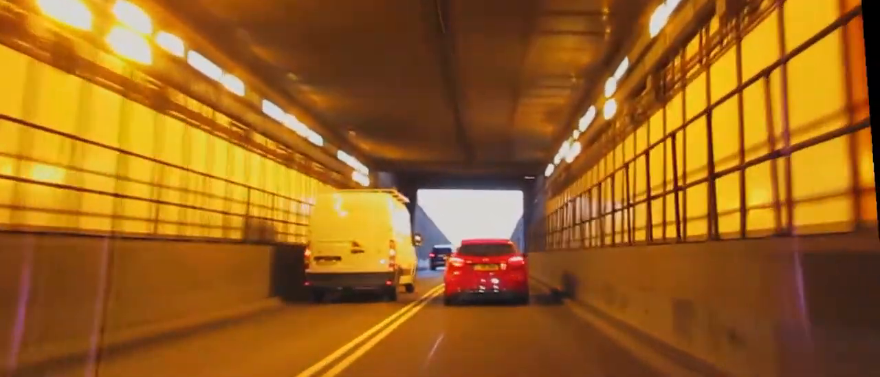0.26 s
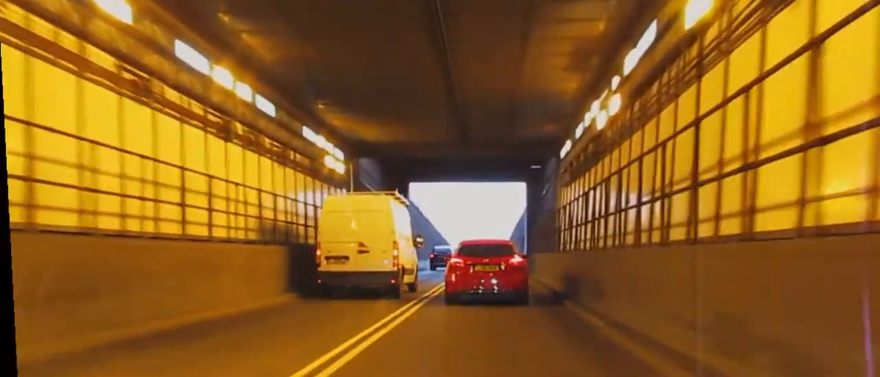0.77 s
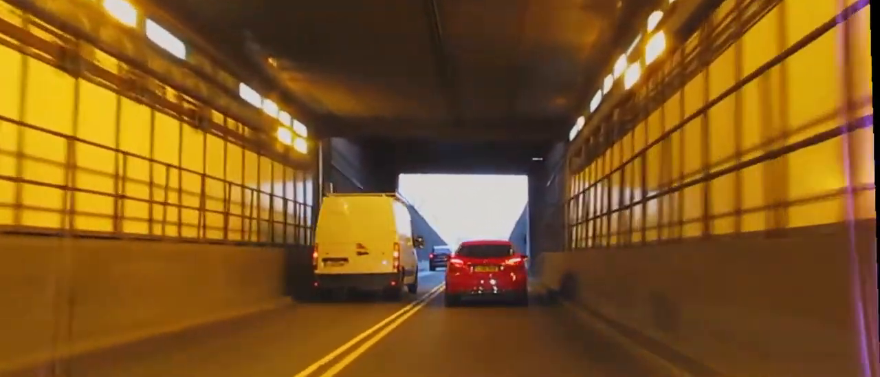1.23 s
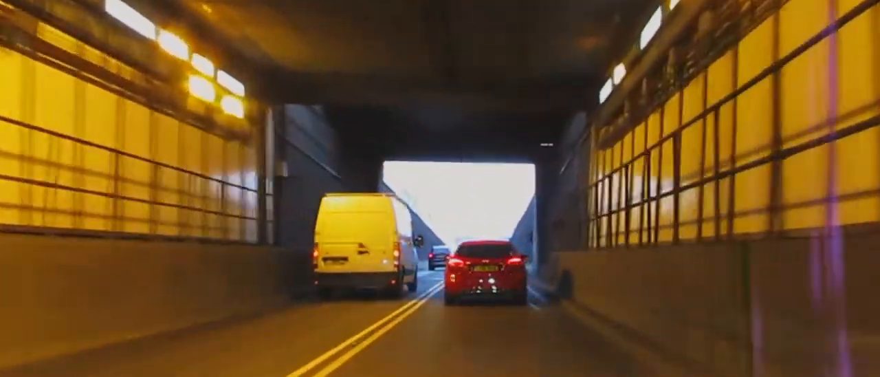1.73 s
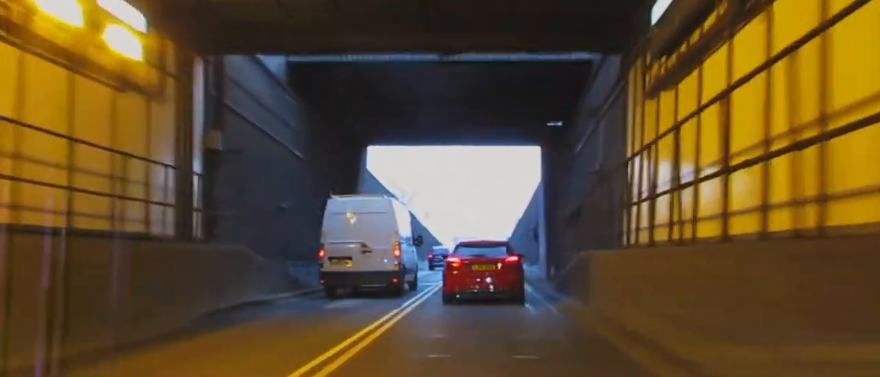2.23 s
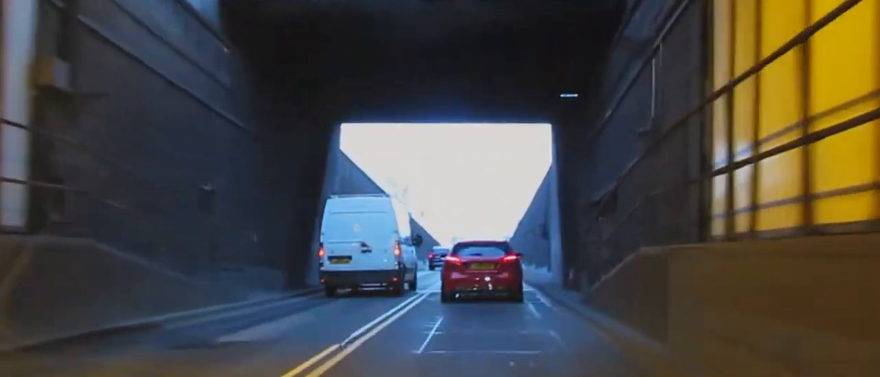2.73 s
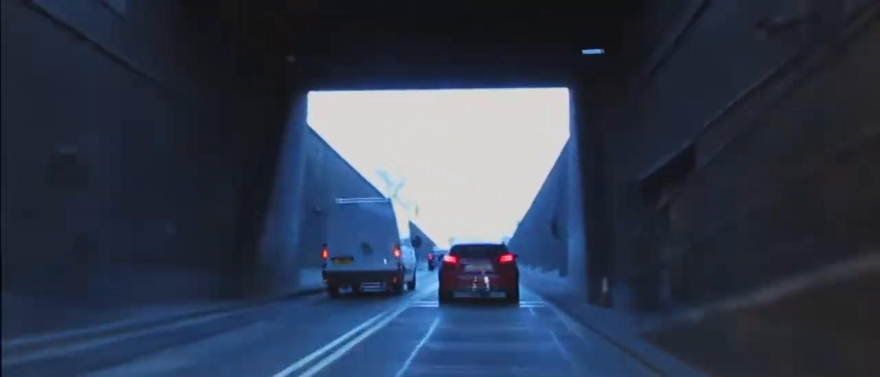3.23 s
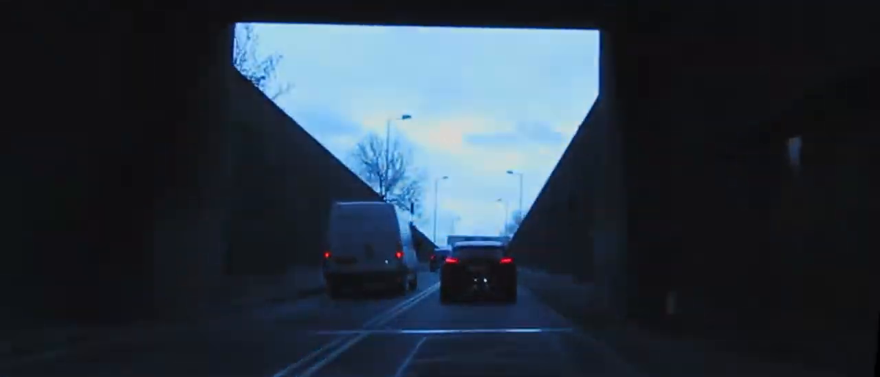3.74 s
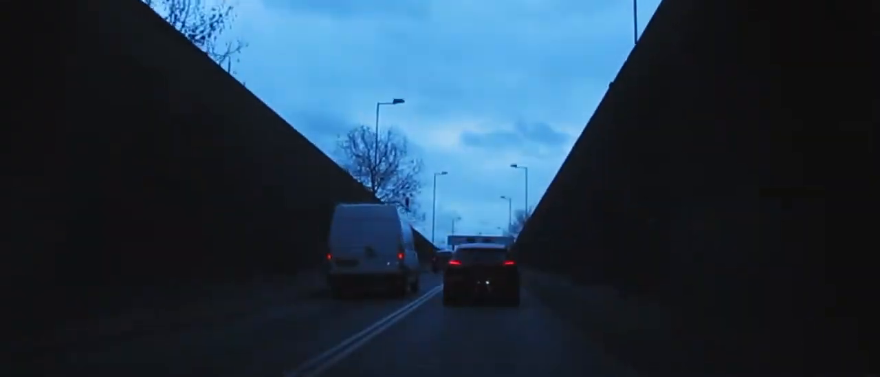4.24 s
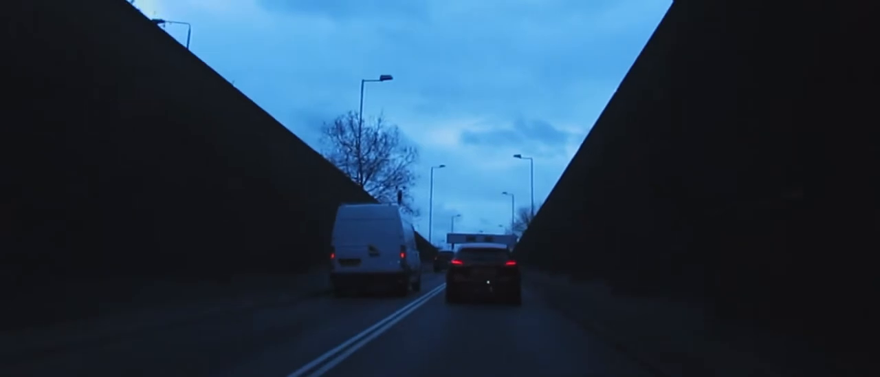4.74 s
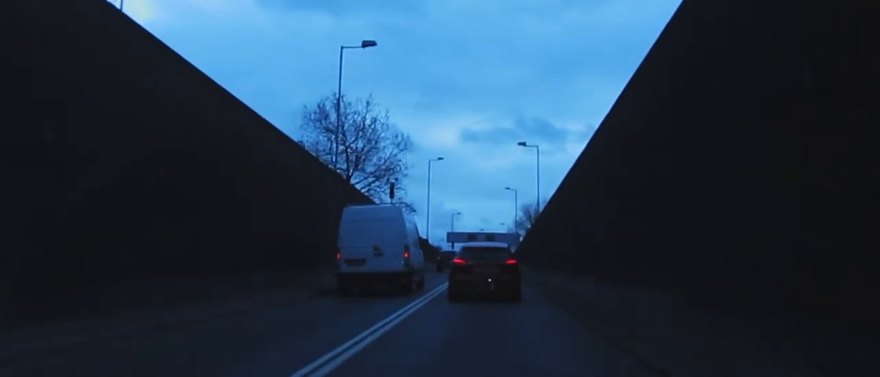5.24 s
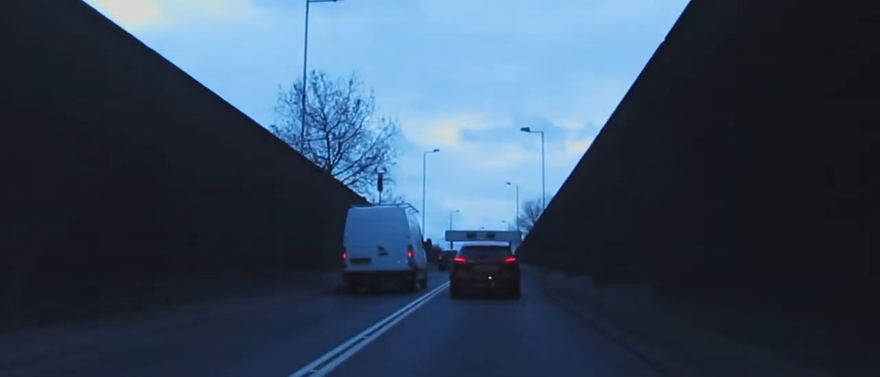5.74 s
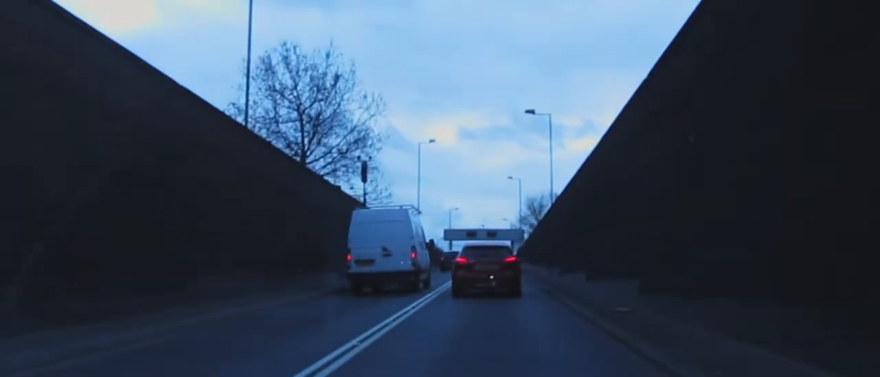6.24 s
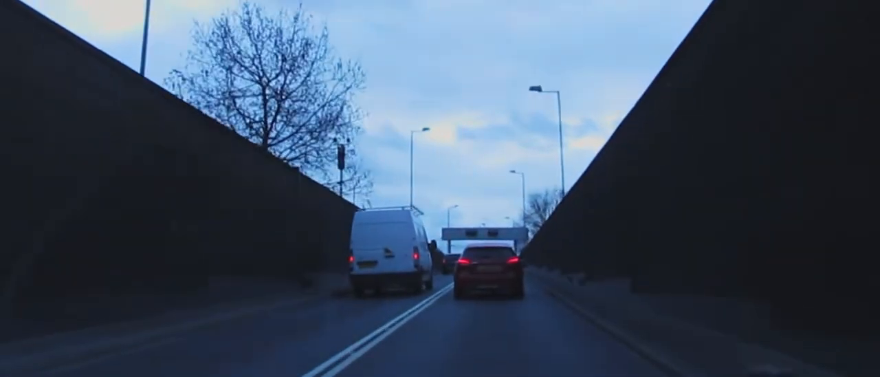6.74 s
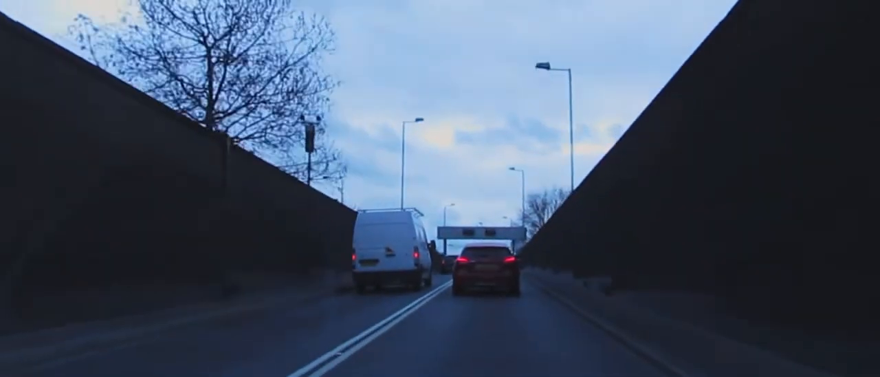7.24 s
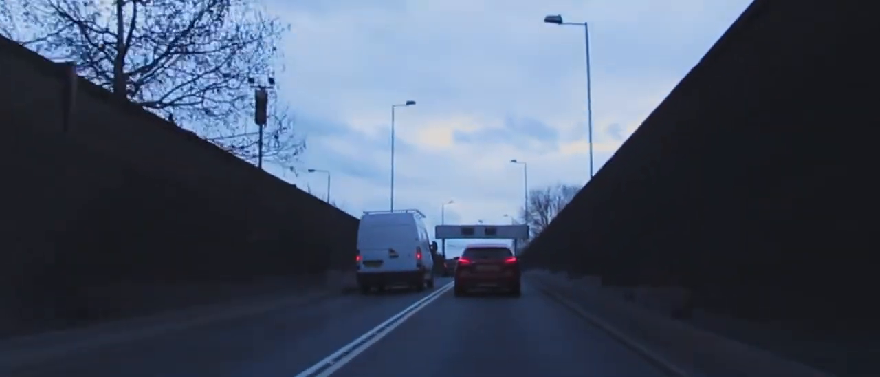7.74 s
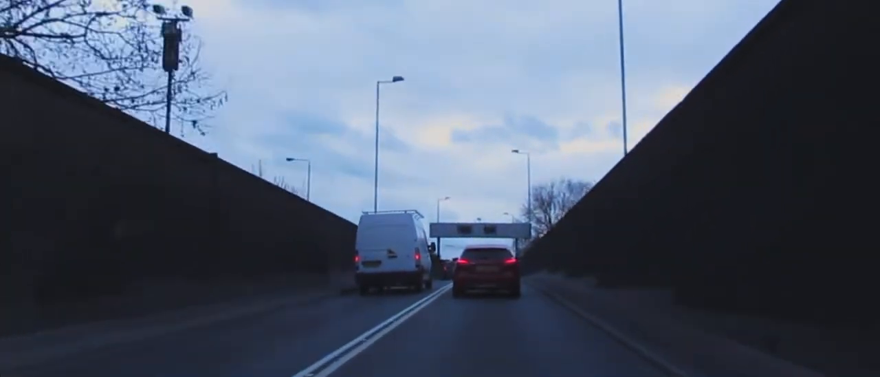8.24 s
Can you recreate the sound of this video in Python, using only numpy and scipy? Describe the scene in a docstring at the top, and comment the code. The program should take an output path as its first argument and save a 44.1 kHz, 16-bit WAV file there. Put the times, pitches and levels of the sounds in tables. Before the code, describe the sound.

Inside a car in a tunnel, low engine drone and echoing tyre roar, then thumps at the mouth, quieter road and a harder-pulling engine.

```python
"""Inside a car in a road tunnel: the engine drones at low revs and the tyre roar comes back off the walls.
At the mouth the worn road thumps under the wheels, and the roar falls away in steps past the roof and portal.
Then a few small ticks and a brush of cloth come through, while the engine pulls harder up an open ramp
between concrete walls. The engine is a sum of multiples of its firing rate; road, tyres and air are
filtered noise; thumps and ticks are short pushes and bursts ringing resonances, and cloth is grainy hiss."""
import sys
import numpy as np
from scipy import signal
from scipy.fft import rfft, irfft, next_fast_len
from scipy.io import wavfile

SR = 44100
rng = np.random.default_rng(int(sys.argv[2]) if len(sys.argv) > 2 else 0)


def materialize(psi):
    """Save the field psi as 16-bit PCM at rate SR to the path in sys.argv[1].

    A 1-D psi becomes a single channel; in a 2-D psi each row is a channel.
    """
    bounded = np.clip(np.atleast_2d(psi).T, -1, 1)
    quanta = np.round(bounded * 32767).astype(np.int16)
    wavfile.write(sys.argv[1], SR, quanta)


N = 374406
TIME = np.arange(N) / SR  # seconds
SIZE = 2 * next_fast_len(N // 2 + 1, True)  # even FFT length
FREQ = np.maximum(np.arange(SIZE // 2 + 1) * SR / SIZE, 1)  # Hz, kept off zero

# Joints and dips in the road. Each row: time in seconds, peak level in dB, judder from 0 to 1.
JOINTS = [(3.608, -12.5, 0.37), (3.757, -8, 0), (4.214, -12.5, 0.06), (4.352, -8.5, 0.13),
          (4.53, -11, 0.24), (4.565, -9.5, 0.15), (4.59, -7, .3), (4.633, -9, 0.25), (4.708, -11.5, .15),
          (4.771, -11, .6), (4.798, -5, 0.15), (4.812, -11, 0.8), (4.841, -16, 0), (4.953, -18, .02)]
TYRE_RING_HZ = 216.9  # the air inside the tyres
CLIMB_S = 5.7  # the throttle starts to open for the climb
# the middle and length in seconds of the passage out from under the roof, then out of the portal
ROOF_END_S, ROOF_PASSING_S, PORTAL_END_S, PASSING_S = 3.81, 0.27, 4.49, 0.36


def undb(db):
    """Decibels to gain."""
    return 10 ** (np.asarray(db) / 20)


def unit(x):
    """Scale to rms 1."""
    return x / np.sqrt(np.mean(x ** 2))


def curves(table):
    """Each column of a timed table, at every sample."""
    s, *columns = np.transpose(table)
    return [np.interp(TIME, s, c) for c in columns]


def step(s, length):
    """Glide from 0 to 1 over length seconds, centred on s."""
    return np.clip((TIME - s) / length + .5, 0, 1)


def swell(s, spread):
    """A smooth hump of height 1 centred on s."""
    return np.exp(-((TIME - s) / spread) ** 2)


def colour(points):
    """Gain at every frequency from (Hz, dB) points."""
    hz, db = np.transpose(points)
    return undb(np.interp(np.log(FREQ), np.log(hz), db))


def bands(table):
    """Gain at every frequency from (Hz, width Hz, dB) peaks and dips."""
    return undb(sum(db / (1 + (2 * (FREQ - hz) / width) ** 2) for hz, width, db in table))


def resonance(hz, width):
    """Response of one damped resonance, gain 1 at its centre."""
    return 1 / (1 + 1j * (FREQ ** 2 - hz ** 2) / (FREQ * width))


def shape(x, response):
    """Pass a sound through a frequency response."""
    return irfft(rfft(x, SIZE) * response, SIZE)[..., :N]


def walk(rate):
    """Smooth chance with spread 1, changing about rate times a second."""
    return unit(shape(rng.standard_normal(N), np.exp(-(FREQ / rate) ** 2) * (FREQ > 1)))


def diffuse(response):
    """Noise of rms 1 filling the cabin: the bass is nearly alike at both ears, the treble much less so."""
    # Stereo spread. Each row: frequency in Hz, side level relative to mid in dB.
    spread_points = [(60, -19), (110, -13), (200, -28), (380, -13.5), (700, -10.5), (1290, -6.5),
                     (2380, -1), (4400, -3.5), (8120, 1.5), (15000, 3)]
    mid, side = rng.standard_normal((2, N))
    width = colour(spread_points)
    side = shape(side, width)
    ears = np.array([mid + side, mid - side])
    return unit(shape(ears, response / np.sqrt(1 + width ** 2)))


def reflections(share, decay_s=0.00437, corner_hz=1500):
    """The direct path plus milliseconds of echoes off small panels, which reflect mainly short waves."""
    echoes = rng.standard_normal(N) * np.exp(-TIME / decay_s) * (TIME > decay_s / 2)
    spectrum = rfft(echoes, SIZE) / np.sqrt(np.sum(echoes ** 2))
    return 1 + share * spectrum / (1 + (corner_hz / FREQ) ** 2)


def cabin():
    """The low modes of the car; seats and carpet soak up what lies above them."""
    # Booms of the body and the cabin air. Each row: centre in Hz, width in Hz, level in dB.
    booms = [(31.2, 33.8, 2), (64, 50.6, -3.5), (76, 34, -13), (126, 39, -3.5), (166.5, 18, 0),
             (199, 19.5, -2), (238.5, 19, -3), (314, 42, -8)]
    modes = sum((-1) ** k * undb(db) * resonance(hz, width) for k, (hz, width, db) in enumerate(booms))
    return modes / (1 + (FREQ / 420) ** 4) / (1 + (17 / FREQ) ** 4)


def tyre_give():
    """The tyre gives way under a blow and passes on only its low part."""
    give_hz = 265
    return 1 / (1 + (FREQ / give_hz) ** 10)


def throttle():
    """0 while cruising, 1 while pulling up the ramp."""
    opening_s = 0.51
    return step(CLIMB_S + opening_s / 2, opening_s)


def road(climb_db, worn_db, smooth_db):
    """Offset in dB for a road noise on the climb, on the worn stretch at the mouth and on the smooth one."""
    worn_from_s, smooth_from_s, smooth_to_s, blend_s = 3.2, 4.87, 5.7, 0.12
    worn, smooth, coarse = (step(s, blend_s) for s in (worn_from_s, smooth_from_s, smooth_to_s))
    return climb_db * throttle() + worn_db * (worn - smooth) + smooth_db * (smooth - coarse)


def engine(boom_exponent=0.27):
    """Soft firing pulses as a drone plus overtones, which rise with load and swell through cabin modes."""
    # Engine lines. Each row: multiple of the firing rate, level in dB cruising, level in dB pulling,
    # both before the cabin boom.
    overtones = [(2, -45, -28.3), (3, -34, -22.8), (4, -39.5, -30.5), (5, -42, -34)]
    # Load on the engine. Each row: time in seconds, load from 0 cruising to 1 pulling hard.
    load_points = [(0, 0), (3.25, 0.23), (3.55, 0.61), (4.65, 0.3), (4.95, 0), (5.85, 0.3), (6.03, 0.86),
                   (7.4, 0.95), (8.49, 0.66)]
    # Drone at the firing rate. Each row: time in seconds, level in dB.
    drone_points = [(0, -23.5), (1.1, -17.3), (2.3, -19.3), (3.2, -21.3), (3.7, -25.5), (5.0, -27),
                    (5.4, -24.5), (6.2, -24), (7.5, -22.5), (8.49, -20)]
    firing_hz, creep_from_s, creep_hz_per_s, climb_hz_per_s = 41.9, .9, .75, 1.55
    hunt, drone_waver_db, overtone_waver_db = .0015, 1.0, .8  # hunt is a fraction of the firing rate

    # the revs rise gently, then faster on the climb
    creep = creep_hz_per_s * (np.clip(TIME, creep_from_s, CLIMB_S) - creep_from_s)
    climb = climb_hz_per_s * np.maximum(TIME - CLIMB_S, 0)
    hz = firing_hz + creep + climb
    phase = 2 * np.pi * np.cumsum(hz * (1 + hunt * walk(16.0))) / SR
    drone_db, = curves(drone_points)
    load, = curves(load_points)
    modes = cabin()
    lag = np.unwrap(np.angle(modes))
    out = undb(drone_db + drone_waver_db * walk(16)) * np.cos(phase)
    for multiple, cruise_db, pull_db in overtones:
        db = cruise_db + (pull_db - cruise_db) * load
        boom = np.interp(multiple * hz, FREQ, np.abs(modes)) ** boom_exponent
        boom = boom / np.average(boom, weights=throttle())  # averages 1 on the climb
        gain = boom * undb(db + overtone_waver_db * walk(19.0))
        out = out + gain * np.cos(multiple * phase + np.interp(multiple * hz, FREQ, lag))
    return np.sqrt(2) * out  # levels are rms


def rumble(level_db=-22, patchy_db=0.25, shudder_db=-17, shudder_s=0.073):
    """Coarse asphalt shakes the suspension and rings the cabin; around each joint the body shudders."""
    road_db = level_db + road(climb_db=1.2, worn_db=0.9, smooth_db=-1.0)
    steady = diffuse(cabin()) * undb(road_db + patchy_db * walk(35))
    broken = np.max([undb(db) * swell(s, shudder_s) for s, db, _ in JOINTS], axis=0)
    body = cabin() * (1 + 2 * resonance(hz=40, width=22)) * tyre_give()
    return steady + diffuse(body) * undb(shudder_db) * broken


def buffet(level_db=-30.0, centre_hz=30, width_hz=14):
    """Air stirred up by the traffic in the tunnel presses on the body, a low noise that ends at the portal."""
    inside = 1 - step(PORTAL_END_S, PASSING_S)
    return diffuse(resonance(centre_hz, width_hz) ** 2) * undb(level_db) * inside


def cavity(level_db=-29.5, width_hz=11):
    """The ring of air in each tyre is struck by the road and hums at one fixed pitch."""
    hum_db = level_db + road(climb_db=3.6, worn_db=-1.5, smooth_db=-4.0)
    return diffuse(resonance(TYRE_RING_HZ, width_hz) ** 2) * undb(hum_db)


def roar(patchy_db=.5, flutter_db=0.43, surge_db=0.5, treble_hz=2200):
    """Tyre noise, direct and thrown back by the walls, both heard through the windows."""
    # Colour of the direct tyre noise. Each row: frequency in Hz, relative level in dB per Hz.
    tyre_points = [(150, -42), (260, -5.5), (350, 0), (500, -4), (700, -4.5), (1000, -3), (1550, -9.5),
                   (1950, -15), (2900, -21), (3700, -31), (7000, -39), (11300, -40.5), (13000, -46),
                   (16000, -62)]
    # Colour of its wash off the walls. Each row: frequency in Hz, relative level in dB per Hz.
    wash_points = [(120, -10), (300, 0.5), (480, -2.5), (700, -1), (1000, -2), (1550, -7), (2000, -8.5),
                   (3000, -14.5), (4000, -20.5), (6000, -28.5), (7200, -28.5), (11000, -34), (13000, -45),
                   (16000, -66)]
    # Glass and trim pass some bands and block others. Each row: centre in Hz, width in Hz, gain in dB.
    pane_bands = [(620, 140, 1.5), (808, 64, -4.5), (1030, 89, 1), (1110, 76, -5.5), (1196, 40, 1.5),
                  (1290, 31, 1), (1625, 180, 1.5), (1738, 48, -3), (2070, 136, -4.5), (2150, 45, 2.5),
                  (2470, 310, -2.5), (2890, 190, 1.5), (4090, 210, -3.5), (4410, 180, 2), (5610, 470, 4),
                  (6220, 190, 4.5)]
    # The tunnel colours its wash further. Each row: centre in Hz, width in Hz, gain in dB.
    tunnel_bands = [(427, 57, -3), (510, 61, 2.5), (744, 72, 1), (1330, 56, 2.5)]
    # Brief swells and dips of the roar. Each row: centre in seconds, half length in seconds, change in dB.
    surges = [(0.095, 0.13, 2), (0.378, 0.074, -0.5), (3.62, 0.15, 0.6), (4.51, 0.12, 2.1),
              (4.98, 0.14, -1), (6.046, 0.071, 1.4), (8.45, 0.19, 1.8)]
    tyre_db = -27  # cruising on coarse asphalt
    body_start_db, body_db_per_s, body_roof_db, body_portal_db = -22.5, -0.56, -5.5, -6
    treble_start_db, treble_roof_db, treble_portal_db = -25, -0.5, -4.5
    mouth_s, mouth_spread_s, mouth_db = 3.3, 0.44, 1.5  # the wash brightens near the mouth
    ramp_db_per_s = -1  # fade of the whole wash along the ramp

    panes = bands(pane_bands) * np.array([reflections(.2), reflections(.2)])
    direct_db = tyre_db + road(climb_db=0.1, worn_db=.5, smooth_db=-0.3) + patchy_db * walk(9.6)
    tyres = diffuse(colour(tyre_points) * panes) * undb(direct_db)

    wash = diffuse(colour(wash_points) * panes * bands(tunnel_bands))
    # past the roof only short echo paths remain, and they keep their treble
    treble = shape(wash, 1 / (1 + (treble_hz / FREQ) ** 3))
    body = wash - treble
    roofless, outside = step(ROOF_END_S, ROOF_PASSING_S), step(PORTAL_END_S, PASSING_S)
    body_db = body_start_db + body_db_per_s * TIME + surge_db * walk(2.2)
    body_db = body_db + body_roof_db * roofless + body_portal_db * outside
    treble_db = treble_start_db + mouth_db * swell(mouth_s, mouth_spread_s)
    treble_db = treble_db + treble_roof_db * roofless + treble_portal_db * outside
    ramp_db = ramp_db_per_s * np.maximum(TIME - PORTAL_END_S, 0)
    wash = (body * undb(body_db) + treble * undb(treble_db)) * undb(ramp_db + flutter_db * walk(30))
    return (tyres + wash) * undb(sum(db * swell(s, spread) for s, spread, db in surges))


def tread():
    """The tread howls in narrow resonances; each swells on its own and wanders a little in pitch."""
    # Tread on the road. Each row: centre in Hz, width in Hz, level in dB in the tunnel, level in dB outside.
    howls = [(644.7, 72, -37.5, -37), (1010, 78, -40.5, -39.5)]
    swell_db, wander = 2, .015  # wander is a fraction of the pitch
    out = np.zeros((2, N))
    for hz, width, tunnel_db, outside_db in howls:
        clock = TIME + wander * np.cumsum(walk(2.03)) / SR  # reading the noise unevenly bends its pitch
        howl = np.array([np.interp(clock, TIME, ear) for ear in diffuse(resonance(hz, width) ** 2)])
        db = tunnel_db + (outside_db - tunnel_db) * step(PORTAL_END_S, PASSING_S)
        out += howl * undb(db + swell_db * walk(2.4))
    return out


def sizzle(fade_s=0.17):
    """The tyres sing in one narrow band while they roll over a patch of different surface."""
    # Patches of road. Each row: start in seconds, end in seconds, pitch in Hz, width in Hz, level in dB.
    patches = [(-.2, 1.65, 690, 110, -34.5), (2.15, 3.3, 986, 138.8, -36.5), (-.2, 3.85, 1292, 60, -38.5),
               (2.8, 4, 3340, 450, -46), (3.58, 4.8, 5600, 334, -52), (5.25, 5.9, 1750, 500, -39.5),
               (5.3, 6.4, 2900, 700, -46.5)]
    out = np.zeros((2, N))
    for start, end, hz, width, db in patches:
        on_patch = np.clip(np.minimum(TIME - start, end - TIME) / fade_s, 0, 1)
        out += undb(db) * on_patch * diffuse(resonance(hz, width) ** 2)
    return out


def bumps(push_s=.0026, judder_s=0.022, boom_db=0, ring_db=-2):
    """A wheel meets a joint: a soft push and short judder ring the cabin and tyre air and boom the roof."""
    roof = undb(boom_db) * resonance(hz=37, width=7)
    tyre_air = undb(ring_db) * resonance(TYRE_RING_HZ, width=30)
    body = (cabin() + roof - tyre_air) * tyre_give()
    wheel = resonance(hz=170, width=460)  # the band in which a struck wheel judders
    out = np.zeros(N)
    for s, db, judder in JOINTS:
        age = np.maximum(TIME - s, 0)
        push = age / push_s * np.exp(-age / push_s)
        chatter = unit(shape(rng.standard_normal(N), wheel))
        shake = judder * chatter * (age > 0) * np.exp(-age / judder_s)
        thump = shape(push + shake, body)
        out += undb(db) * thump / np.abs(thump).max()
    return out


def ticks(grain_db=3, lower_ratio=0.55, lower_db=-6, soft_ratio=1.9):
    """Plastic slips in a quick burst of tiny catches that ring a main mode and a weaker, lower one."""
    # Ticks and creaks in the cabin. Each row: time of the burst's peak in seconds, peak level in dB,
    # pitch in Hz, width in Hz, rise in seconds, decay in seconds.
    slips = [(4.803, -32, 6000, 4500, .018, .02), (5.657, -32, 9000, 5000, .004, .01),
             (5.678, -29, 11100, 1700, .004, .014), (5.68, -35, 15000, 900, .002, .011),
             (5.699, -37, 11400, 2600, .002, 0.011), (5.95, -21, 2500, 2400, .02, 0.02),
             (6.371, -22, 9200, 2600, .0004, 0.01), (6.556, -27, 9400, 1600, .002, .014),
             (6.568, -23.5, 8800, 2780, .0015, 0.0073)]
    out = np.zeros((2, N))
    for s, db, hz, width, rise, decay in slips:
        age = TIME - s
        burst = np.exp(-np.minimum(np.maximum(age / decay, -age / rise), 20))
        catches = rng.standard_normal((2, N)) * undb(grain_db * rng.standard_normal(N))
        modes = resonance(hz, width) - undb(lower_db) * resonance(hz * lower_ratio, width)
        softness = 1 / (1 + (FREQ / (hz * soft_ratio)) ** 4)
        tick = shape(catches * burst, modes * softness)
        out += undb(db) * tick / np.abs(tick).max()
    return out


def cloth(drag_db=0.2, grain_db=2.5, echo_share=.3):
    """Fibres catch and slide: each stroke is a thin, grainy hiss, coloured by nearby surfaces."""
    # Colour of the hiss. Each row: frequency in Hz, relative level in dB per Hz.
    hiss_points = [(2000, -15), (4500, -8), (7400, -8), (8200, -2), (9500, -6.5), (11400, -2.5),
                   (12700, -10), (16000, -16)]
    # Each row: peak time in seconds, rms level at the peak in dB, rise in seconds, decay in seconds.
    strokes = [(5.53, -51, 0.12, .2), (5.69, -47.5, 0.041, 0.46), (6.86, -40.5, 0.045, 0.25),
               (6.99, -42, 0.085, 0.15), (7.21, -46, 0.093, 0.21), (7.55, -50, .15, 0.72),
               (8.2, -51.5, .12, 0.3)]
    power = 0
    for s, db, rise, decay in strokes:
        fall = np.exp(-np.maximum(TIME - s, 0) / decay)
        stroke = np.where(TIME < s, swell(s, rise), fall)
        power = power + (undb(db) * stroke) ** 2
    grainy = diffuse(colour(hiss_points)) * undb(grain_db * walk(900))
    fibres = unit(shape(grainy, reflections(echo_share)))
    return fibres * np.sqrt(power) * undb(drag_db * walk(40))


def scene():
    """Everything as it meets behind the windscreen."""
    running = engine() + rumble() + buffet() + cavity() + roar() + tread() + sizzle()
    return running + bumps() + ticks() + cloth()


def record(dry):
    """The left microphone is a little louder; peaks near full scale are rounded and the top is cut steeply."""
    left_db, ceiling, top_hz = 1.68, .95, 15700  # left relative to right; ceiling in parts of full scale
    wet = dry * undb(np.array([[left_db], [-left_db]]) / 2)
    wet = wet / (1 + (wet / ceiling) ** 8) ** (1 / 8)
    return signal.sosfilt(signal.ellip(10, .1, 80, top_hz, fs=SR, output="sos"), wet)


dry = scene()
out = record(dry)
materialize(out)
```